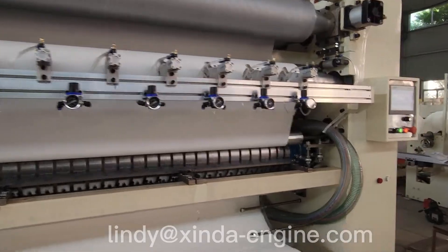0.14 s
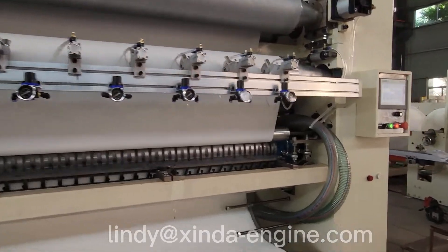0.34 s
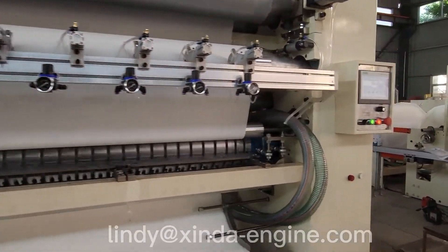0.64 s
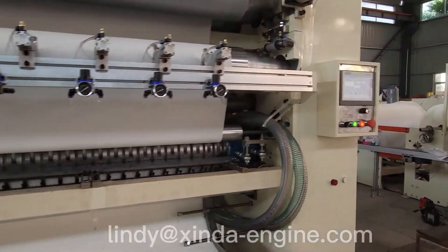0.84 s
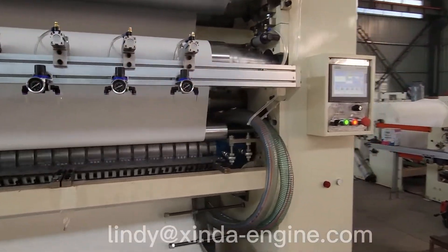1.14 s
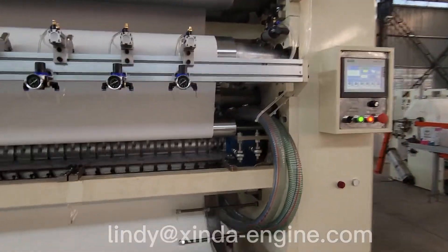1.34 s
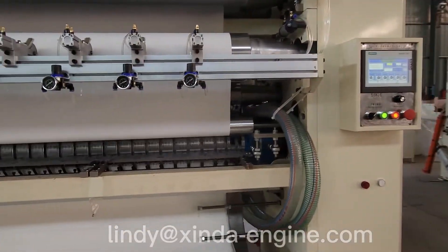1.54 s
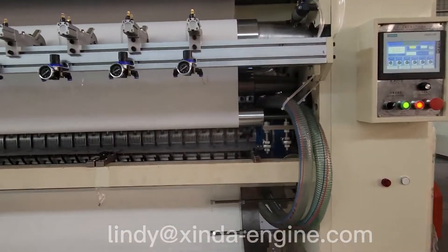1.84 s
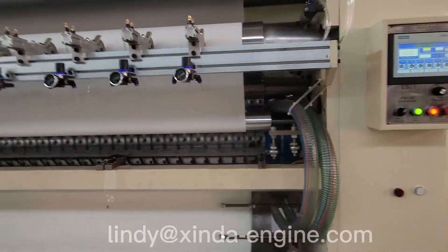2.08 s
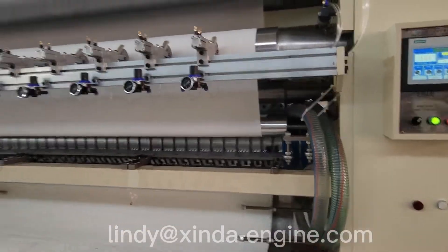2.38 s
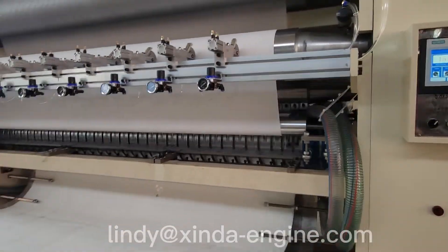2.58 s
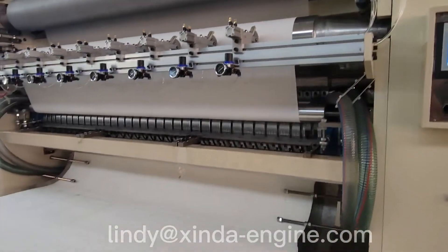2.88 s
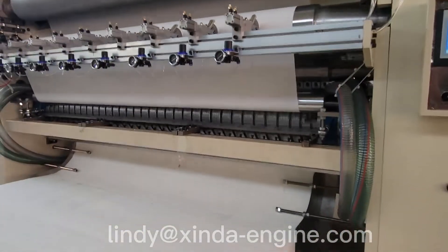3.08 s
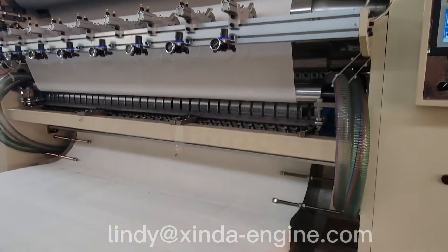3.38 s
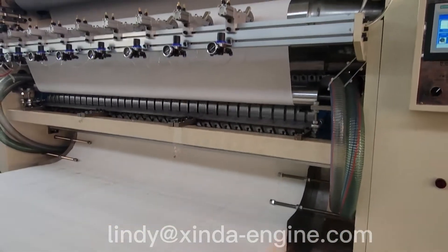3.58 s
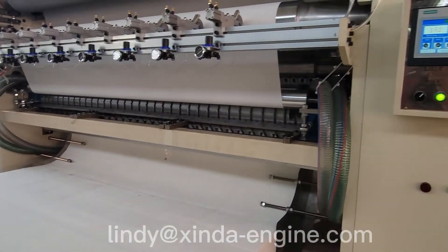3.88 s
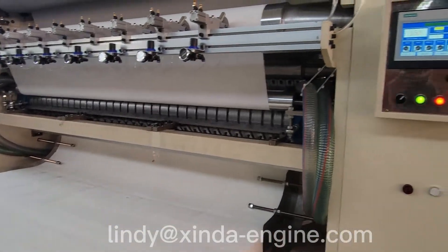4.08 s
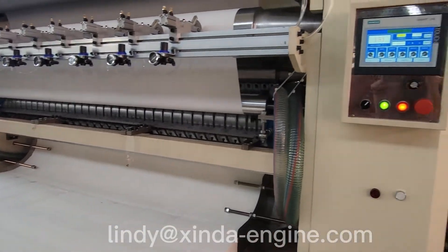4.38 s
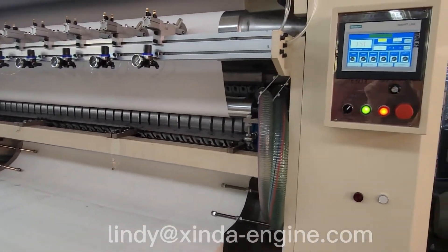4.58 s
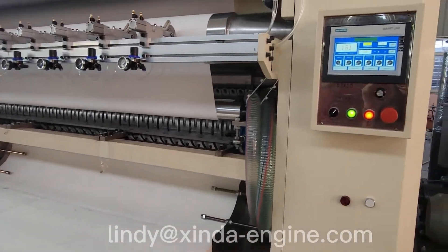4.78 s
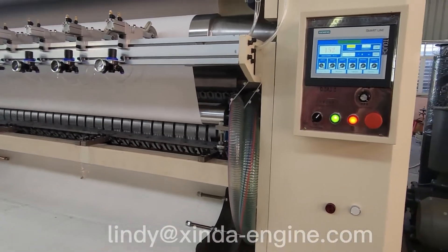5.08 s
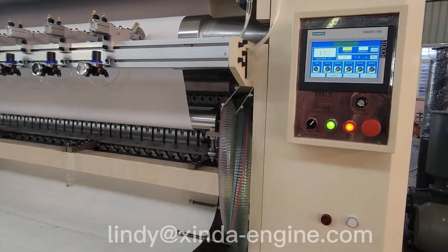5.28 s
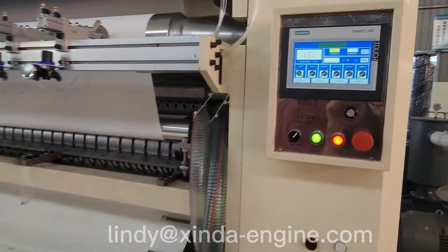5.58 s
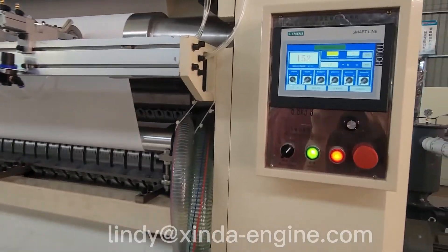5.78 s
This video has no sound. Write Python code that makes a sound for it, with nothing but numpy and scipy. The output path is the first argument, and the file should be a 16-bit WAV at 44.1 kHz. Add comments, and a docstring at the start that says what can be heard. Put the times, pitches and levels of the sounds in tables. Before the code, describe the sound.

A large tissue folding machine runs without pause in a factory hall. Its vacuum blower holds a low drone at one pitch, while steel knives and grippers knock and clink about eight times a second. Each cycle brings a suction hiss, a soft thump of air and a light snap of paper. Parts swell and fade as the microphone moves slowly along the front, with a dull hall roar behind.

```python
"""A one-pitch drone under knocks, hisses and thumps, about eight a second: a tissue folding machine.
The vacuum blower drones and sets up standing waves in the hall. Each sheet is cut and folded: knives
and grippers ring steel, suction ports hiss and puff, the paper snaps. Four knives share one roller turn.
The paper web rubs and the hall roars behind. Parts swell and fade as the mic moves slowly along the front."""
import sys
import numpy as np
from scipy import signal
from scipy.fft import rfft, irfft, next_fast_len
from scipy.io import wavfile

SR = 44100
rng = np.random.default_rng(int(sys.argv[2]) if len(sys.argv) > 2 else 0)


def generate_wav(sig):
    """Save sig (samples, or channels by samples) to the path in sys.argv[1] as 16-bit PCM at SR."""
    pcm = np.round(np.clip(np.atleast_2d(sig).T, -1, 1) * 32767).astype(np.int16)
    wavfile.write(sys.argv[1], SR, pcm)


N = 261513

BLOWER_HZ, SHEET_HZ = 165.45, 8.144
AIR_LAG_MS, RING_LAG_MS = 0.504, 0.39  # machine on the left: right channel later

# Levels are relative; t/ms counts within a sheet cycle, t/s within the scene.
# standing waves of blower partials 1-4: t/s, left/dB, right/dB, left lead/rad
PARTIAL_1 = [(0.0, -15, -14.5, 0.19), (0.45, -16.0, -18.5, 0.024), (0.9, -26, -26, -0.76),
             (1.44, -22, -18, 0.18), (1.98, -17.5, -15, 0.35), (4.77, -15.5, -14.5, -0.052),
             (5.91, -17.5, -18.5, 0.15)]
PARTIAL_2 = [(0.0, -22.5, -19.5, 0.8), (0.45, -22, -27, -1), (0.72, -31, -23, -5), (1.08, -21, -15, -5.5),
             (1.71, -20, -24, -6), (3.33, -31.5, -32.5, -7.5), (3.78, -30, -34, -15), (4.23, -28, -34, -10),
             (4.5, -27.5, -48, -16), (4.95, -26, -35, -12), (5.91, -20, -18.5, -12.5)]
PARTIAL_3 = [(0.0, -34.5, -56, -4.5), (1.44, -50, -38, 1), (2.61, -30.5, -26, -1.3), (4.05, -32, -32, 1),
             (5.91, -29, -35, 3)]
PARTIAL_4 = [(0.0, -46, -28.5, 3), (0.629, -31, -23, 4.5), (1.26, -25.5, -24, 4.5), (1.62, -26, -21, 4),
             (1.8, -28, -18, 4.5), (1.98, -21.5, -22, 5.5), (2.43, -33, -23.5, 2), (2.52, -28, -21, 1.3),
             (3.35, -30.5, -21, 1), (4.23, -24.4, -29.6, -2.5), (4.32, -23.5, -20.5, -3),
             (5.49, -19, -18.5, -5.5), (5.91, -23, -25, -5.5)]
# weak blower partials: f/BLOWER_HZ, level/dB
WEAK_PARTIALS = [(2.5, -37.5), (4.5, -43.5), (5, -41), (6.6, -46.5), (8, -43), (12, -37), (16, -48)]
# knife strikes and rebounds: t/ms, f/Hz, width/Hz, nearest/s, half-power time/s, level/dB for knives 1-4
KNIFE_BLOWS = [(96.5, 1850, 150, 0.8, 0.97, -10, -12, -16, -10),
               (99.1, 2240, 115, 4.1, 13, -24, -16, -19, -20),
               (115.8, 1450, 250, 3.6, 3.5, -21, -8, -30, -34),
               (113.8, 1950, 170, 4.6, 1.1, -17, -17, -26, -14),
               (127, 1990, 90, 1, 2.9, -19, -14, -13, -19)]
# grippers opening and shutting: columns as KNIFE_BLOWS
GRIPPER_BLOWS = [(48.56, 1950, 130, 3.1, 1.34, -12.5, -12.5, -6.5, -11.5),
                 (76, 1966, 120, 6.2, 3.8, -23, -30, -23, -22)]
# hard knife hits on the anvil: t/s, level/dB
HARD_HITS = [(0.0948, -9.5), (0.4643, -9.5), (0.587, -10), (0.9557, -7.5), (1.079, -8), (1.4476, -9),
             (1.5716, -7.5), (1.94, -10), (2.0632, -11), (2.4324, -14), (2.5545, -14), (3.046, -14),
             (3.5375, -14), (4.029, -14), (4.5201, -13), (5.011, -14)]
# anvil modes: f/Hz, decay/ms
ANVIL_MODE_PAIR = [(1830, 5.5), (2030, 7)]
# play closing in the mechanism: t/s, level/dB
PLAY_CLACKS = [(0.223, -15), (0.7284, -14), (2.188, -12), (4.1674, -12), (4.399, -16), (4.6453, -13),
               (4.6584, -15), (5.1504, -16), (5.6427, -19)]
# suction port flow: t/ms, rise/ms, hold/ms, decay/ms, whistle f/Hz, width/Hz, level/dB
PORT_GUSTS = [(96.1, 2.45, 1.8, 4.9, 12800, 7000, -22), (99.7, 5.7, 25.6, 4, 17200, 4500, -21.5),
              (36.2, 8.6, 5, 11.5, 9200, 5100, -20.5)]
# rushing air spectrum: f/Hz, level/dB
AIR_SPECTRUM = [(1000, 7), (1400, 13), (2400, 10.5), (3700, 2), (5500, 0), (9000, 0.5), (16000, -1.5)]
# nearness of the ports, furthest midway: t/s, level/dB
PORT_NEARNESS = [(0, -1.5), (0.9, 1.3), (3.4, -1.16), (5.93, 1.6)]
# ports opening and shutting: t/ms, half length/ms, level/dB
PORT_PUFFS = [(121.95, 1.36, 1.5), (66.5, 1.72, -5), (100.55, 1.16, -8.5), (34.9, 3, -12)]
# walk past the puffs: nearest/s, half-power time/s, direct/dB, diffuse/dB
PUFF_PASSING = (0.94, 0.52, 2, -5.5)
# sheet snaps and flicks, and an air jet that passes near the end: t/ms, decay/ms, f/Hz, width/Hz, nearest/s,
# half-power time/s, level/dB
FLICKS_AND_JET = [(95, 9, 5900, 2400, 0.5, 0.79, -26), (95.3, 7, 12300, 1900, 5.77, 0.38, -22),
                  (127.7, 1.3, 13000, 4400, 1.1, 1.0, -28), (123.6, 3, 5900, 2500, 1.6, 1.0, -29),
                  (39.5, 6.4, 6100, 3500, 1.5, 0.72, -27.5)]
# web rumble, rub and swish on the rollers: f/Hz, width/Hz, level/dB
WEB_RUB = [(342, 310, -37), (866, 430, -35), (3500, 6200, -43)]
# web and roller swells: t/s, half length/s, f/Hz, width/Hz, level/dB
WEB_SWELLS = [(1.007, 0.5, 275, 300, -28.5), (1.943, 0.09, 880, 260, -26.5), (2.288, 0.009, 890, 200, -21),
              (2.595, 0.46, 870, 277, -32), (3.64, 0.1, 328, 300, -23.5), (4.507, 0.69, 2980, 3000, -34),
              (4.5, 0.6, 910, 440, -30), (5.452, 0.15, 310, 260, -24.5)]
# hall roar spectrum: f/Hz, level/dB
HALL_SPECTRUM = [(20, -21), (45, -11), (64, 1), (100, -5), (200, 1), (400, -1.5), (600, -9), (850, -4),
                 (1200, -10), (2000, -5), (3000, -16), (4500, -22), (9000, -26), (16000, -25)]
# diffuse field: f/Hz, left-right correlation
DIFFUSE_CORRELATION = [(60, 0.74), (130, 1), (290, 0.66), (640, 0.46), (1150, -0.43), (3000, -0.2),
                       (15000, 0.082)]
# mic response: f/Hz, left/dB, right/dB
MIC_RESPONSE = [(298, 1, 1), (1500, -0.5, -0.25), (4040, -0.5, 0), (5460, 1, 2), (7240, -1.5, -3),
                (9030, 8, 1), (10940, 0.5, -6), (12860, 9.5, 5), (14000, 7.5, 1.5), (15700, 6, -2.5)]


def blower(wander=0.00047, flutter=0.00089, patchy_db=2.0):
    """Lobe-rate partials; the lowest four dip and shift phase as the mic crosses standing-wave nodes."""
    pitch_hz = BLOWER_HZ * (1 + wander * walk(1.926) + flutter * walk(20))
    angle = 2 * np.pi * np.cumsum(pitch_hz) / SR
    out = np.zeros((2, N))
    for k, table in enumerate((PARTIAL_1, PARTIAL_2, PARTIAL_3, PARTIAL_4), 1):
        at_s, *columns = np.transpose(table)
        left_db, right_db, lead_rad = (np.interp(seconds(), at_s, c) for c in columns)
        phase = k * angle + rng.uniform(0, 2 * np.pi)
        out += undb([left_db, right_db]) * np.sin([phase + lead_rad / 2, phase - lead_rad / 2])
    for k, db in WEAK_PARTIALS:
        for channel in out:
            channel += undb(db + patchy_db * walk(1.8)) * np.sin(k * angle + 2 * walk(0.98))
    # a motor whine at ten times the blower pitch passes along the side of the frame
    whine = passing(nearest_s=5.22, half_s=0.49, direct_db=-36.5, diffuse_db=-60) * np.sin(10 * angle)
    return np.sqrt(2) * (out + whine)


def knocks():
    """Knives snap and rebound, grippers clink, anvil and mechanism knock; the frame answers briefly."""
    knives = blows(KNIFE_BLOWS, scrape_db=-2.5, crack_db=-19, contact_ms=5.5, diffuse_db=-14,
                   drift_ms_per_s=0.45)
    grippers = blows(GRIPPER_BLOWS, scrape_db=4.5, crack_db=-11, contact_ms=4.4, diffuse_db=-18)
    light = undb(-2.7) * room(knives + grippers, t60_s=0.1, wet_db=-6)
    hard = room(anvil() + clatter(), t60_s=0.1, wet_db=-11)
    return light + hard


def blows(table, scrape_db, crack_db, contact_ms, diffuse_db, drift_ms_per_s=0, detune=0.014):
    """Each blow rings one steel mode of unsteady pitch; the contact scrapes and cracks."""
    rings, contact, ms = 0, 0, cycle_ms()
    touch = np.exp(-ms / contact_ms)
    for at_ms, hz, width_hz, nearest_s, half_s, *knife_db in table:
        near = passing(nearest_s, half_s, 0, diffuse_db)
        each_sheet = dict(levels_db=knife_db, scatter_db=1.5, drift_ms_per_s=drift_ms_per_s)
        age = np.pi * width_hz * ms / 1000
        spread = age * np.exp(1 - age)  # the ring takes a moment to spread along the roller
        envelope = strokes(at_ms, spread, jitter_ms=0.37, **each_sheet)
        phase = 2 * np.pi * np.cumsum(hz * (1 + detune * walk(60))) / SR
        lag_rad = 2 * np.pi * hz * RING_LAG_MS / 1000
        rings += near * envelope * np.sin([phase, phase - lag_rad])
        contact += near * strokes(at_ms, touch, jitter_ms=0.3, **each_sheet)
    scrape = undb(scrape_db) * resonance(1990, 1600) ** 2
    crack = undb(crack_db) * resonance(7600, 3200)
    return rings + shape(contact * rng.standard_normal((2, N)), scrape + crack)


def anvil(gain_db=-3.5, balance_db=3, detune=0.015):
    """A hard hit starts two close steel modes in opposition: a snap, then a beat or two."""
    out = np.zeros((2, N + SR))
    ms = np.maximum(cycle_ms() - np.array([[0], [RING_LAG_MS]]), 0)
    for at_s, db in HARD_HITS:
        modes = []
        for hz, decay_ms in ANVIL_MODE_PAIR:
            struck_hz = hz * (1 + detune * rng.standard_normal())
            modes.append(np.exp(-ms / decay_ms) * np.sin(2 * np.pi * struck_hz * ms / 1000))
        low, high = modes
        start = int(at_s * SR)
        out[:, start:start + ms.shape[1]] += undb(db) * (high - low)
    return out[:, :N] * undb(gain_db + np.array([[-balance_db], [balance_db]]) / 2)


def clatter(hz=2150, width_hz=1700, decay_ms=3.3, gain_db=-1):
    """Play in the mechanism closes with dry, broad clacks."""
    contact = np.zeros(N + SR)
    for at_s, db in PLAY_CLACKS:
        burst = undb(db) * np.exp(-cycle_ms() / decay_ms)
        start = int(at_s * SR)
        contact[start:start + len(burst)] += burst
    return undb(gain_db) * contact[:N] * diffuse(resonance(hz, width_hz) ** 3)


def suction_hiss(grain_db=1.5, whistle_db=-1.5, waver_db=1.5, gain_db=-4):
    """Each port hisses with a broad, wavering whistle; the fluttering sheet makes the air grainy."""
    air = rush(undb(spectrum(AIR_SPECTRUM)[0]), direct_share=0.095)
    out = 0
    for at_ms, rise_ms, hold_ms, decay_ms, hz, width_hz, db in PORT_GUSTS:
        hiss = air * strokes(at_ms, gust(rise_ms, hold_ms, decay_ms), [db], jitter_ms=0.7, scatter_db=1.28)
        whistle = shape(hiss, resonance(hz, width_hz))
        out += hiss + whistle * undb(whistle_db + waver_db * walk(15))
    grain = unit(undb(grain_db * walk(1500)))
    return room(undb(gain_db) * out * grain, t60_s=0.2, wet_db=-7)


def suction_puffs(gain_db=-13, boom_hz=64, boom_width_hz=14, boom_db=-1, leak_hz=48, lead_ms=10):
    """Each puff is one push and pull of air; the hollow frame booms and leaks the slowest changes."""
    pressure = 0
    for at_ms, half_ms, db in PORT_PUFFS:
        offset = (cycle_ms() - lead_ms) / half_ms
        push_pull = -offset * np.exp((1 - offset ** 2) / 2)
        pressure += strokes(at_ms - lead_ms, push_pull, [db], jitter_ms=0.52)
    leak = 1 / np.sqrt(1 + (leak_hz / bins()) ** 4)
    boom = undb(boom_db) * resonance(boom_hz, boom_width_hz)
    return undb(gain_db) * shape(pressure, leak * (1 + boom))


def flicks_and_jet(rise_ms=1.4, hold_ms=1.3, diffuse_db=-22):
    """The taut sheet snaps when cut and flicks when folded; near the end a sharp air jet hisses high."""
    out = 0
    for at_ms, decay_ms, hz, width_hz, nearest_s, half_s, db in FLICKS_AND_JET:
        burst = strokes(at_ms, gust(rise_ms, hold_ms, decay_ms), [db], jitter_ms=0.43)
        crackle = unit(shape(rng.standard_normal((2, N)), resonance(hz, width_hz) ** 2))
        out += burst * crackle * passing(nearest_s, half_s, 0, diffuse_db)
    return out


def paper_web():
    """The web rubs over the rollers; single bands swell now and then."""
    out = 0
    for hz, width_hz, db in WEB_RUB:
        out += undb(db) * rush(resonance(hz, width_hz) ** 2, direct_share=0.075)
    for at_s, half_s, hz, width_hz, db in WEB_SWELLS:
        swell = np.exp(-((seconds() - at_s) / half_s) ** 2 / 2)
        out += undb(db) * swell * diffuse(resonance(hz, width_hz) ** 2)
    return out


def hall_roar(level_db=-22.5, waver_db=0.7):
    """Diffuse roar of the drives in the hall."""
    return diffuse(undb(spectrum(HALL_SPECTRUM)[0])) * undb(level_db + waver_db * walk(6))


def strokes(at_ms, gesture, levels_db, jitter_ms, scatter_db=0, drift_ms_per_s=0):
    """One gesture a sheet, levels taken in turn; drift delays it as the mic moves away."""
    out = np.zeros(N + 2 * SR)
    for sheet in range(-1, int(N / SR * SHEET_HZ) + 1):
        late, strong = rng.standard_normal(2)
        sheet_s = sheet / SHEET_HZ
        offset_ms = at_ms + drift_ms_per_s * sheet_s + jitter_ms * late
        start = SR + int((sheet_s + offset_ms / 1000) * SR)
        db = levels_db[sheet % len(levels_db)] + scatter_db * strong
        out[start:start + len(gesture)] += gesture * undb(db)
    return out[SR:SR + N]


def gust(rise_ms, hold_ms, decay_ms):
    """Envelope: linear rise, hold, exponential decay."""
    ms = cycle_ms()
    return np.minimum(ms / rise_ms, 1) * np.exp(-np.maximum(ms - rise_ms - hold_ms, 0) / decay_ms)


def passing(nearest_s, half_s, direct_db, diffuse_db):
    """Walk-by gain: direct sound falls with distance, diffuse sound stays."""
    distance = np.hypot(1, (seconds() - nearest_s) / half_s)
    return np.hypot(undb(direct_db) / distance, undb(diffuse_db))


def rush(response, direct_share):
    """Coloured noise, part direct, part scattered by the frame."""
    left = shape(rng.standard_normal(N), response)
    right = shape(left, np.exp(-2j * np.pi * bins() * AIR_LAG_MS / 1000))
    direct = unit(np.array([left, right]))
    return np.sqrt(direct_share) * direct + np.sqrt(1 - direct_share) * diffuse(response)


def diffuse(response):
    """Noise from all around: channels alike in the bass, unrelated in the treble."""
    correlation = spectrum(DIFFUSE_CORRELATION)[0]
    mid = shape(rng.standard_normal(N), response * np.sqrt(1 + correlation))
    side = shape(rng.standard_normal(N), response * np.sqrt(1 - correlation))
    return unit(np.array([mid + side, mid - side]))


def room(x, t60_s, wet_db):
    """Add a diffuse tail, one per channel."""
    t = np.arange(SR // 2) / SR
    tail = rng.standard_normal((2, len(t))) * np.exp(-np.log(1000) * t / t60_s)
    tail /= np.sqrt(np.sum(tail ** 2, axis=1, keepdims=True))
    return x + undb(wet_db) * signal.fftconvolve(np.atleast_2d(x), tail, axes=1)[:, :N]


def resonance(hz, width_hz):
    """Response of one mode, gain 1 at centre."""
    f = bins()
    return 1 / (1 + 1j * (f * f - hz * hz) / (f * width_hz))


def spectrum(table):
    """Table columns per bin, interpolated over log frequency."""
    hz, *columns = np.transpose(table)
    return np.array([np.interp(np.log(bins()), np.log(hz), c) for c in columns])


def shape(x, response):
    """Filter by a frequency response."""
    size = next_fast_len(N + SR // 2, True)
    return irfft(rfft(x, size) * response, size)[..., :N]


def bins():
    """f/Hz of the padded transform."""
    size = next_fast_len(N + SR // 2, True)
    return np.maximum(np.arange(size // 2 + 1) * SR / size, 1)


def walk(rate_hz):
    """Smooth random curve, spread near 1."""
    knots = rng.standard_normal(int(N / SR * rate_hz) + 2)
    return np.interp(seconds() * rate_hz, np.arange(len(knots)), knots)


def cycle_ms():
    """Time axis of one sheet cycle."""
    return np.arange(int(SR / SHEET_HZ)) / SR * 1000


def seconds():
    """Time axis of the scene."""
    return np.arange(N) / SR


def undb(db):
    """dB to gain."""
    return 10 ** (np.asarray(db) / 20)


def unit(x):
    """Scale to rms 1."""
    return x / np.sqrt(np.mean(x ** 2))


def scene():
    """Drone, sheet cycle and hall along the walk."""
    nearness_db = np.interp(seconds(), *np.transpose(PORT_NEARNESS))
    hiss = suction_hiss() * undb(nearness_db)
    puffs = suction_puffs() * passing(*PUFF_PASSING)
    return blower() + knocks() + hiss + puffs + flicks_and_jet() + hall_roar() + paper_web()


def record(dry):
    """The mic colours the treble and cuts the top."""
    coloured = shape(dry, undb(spectrum(MIC_RESPONSE)))
    top_hz = 15800
    return signal.sosfilt(signal.ellip(12, .1, 80, top_hz, fs=SR, output="sos"), coloured)


dry = scene()
out = record(dry)
generate_wav(out)
```